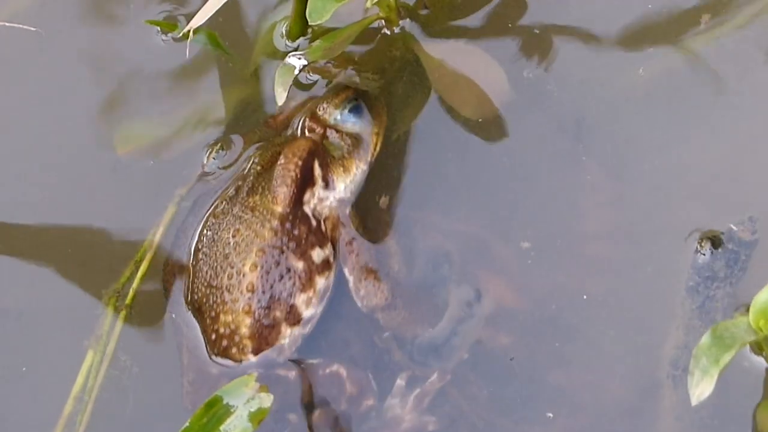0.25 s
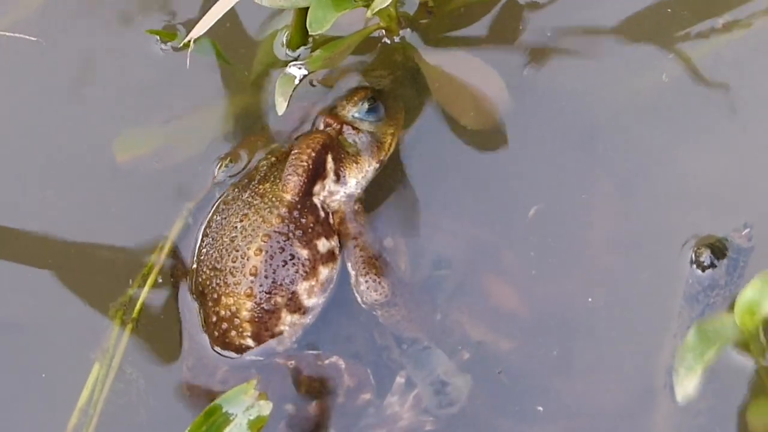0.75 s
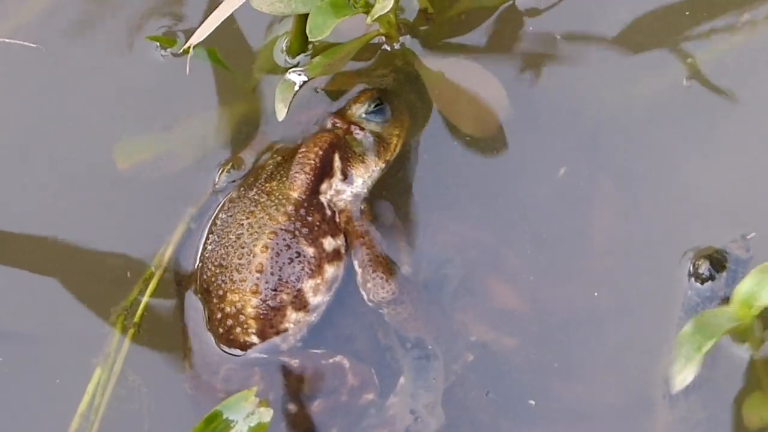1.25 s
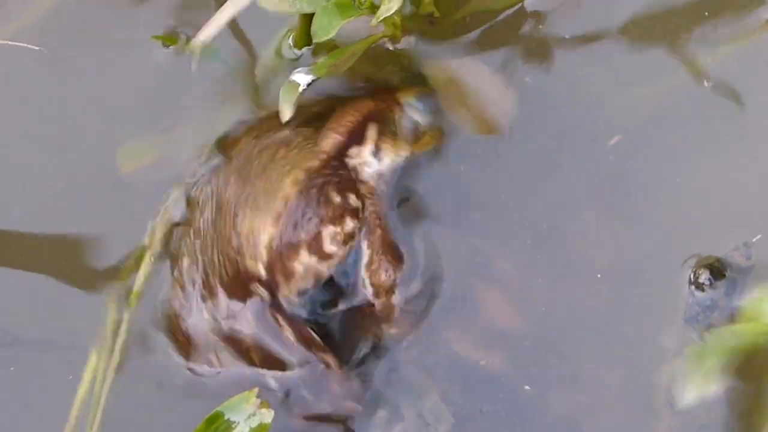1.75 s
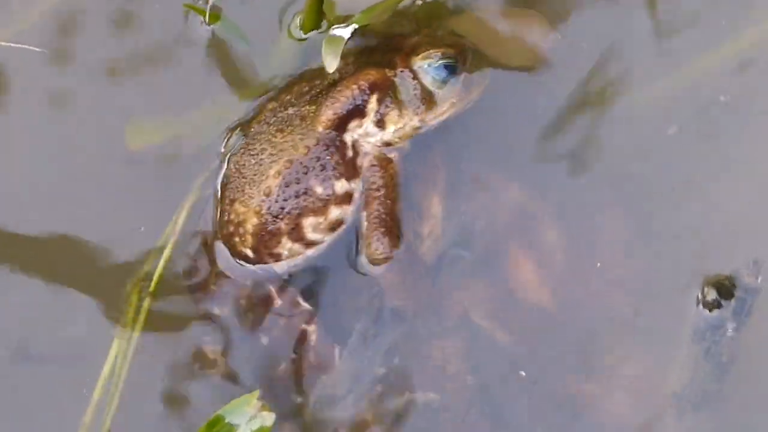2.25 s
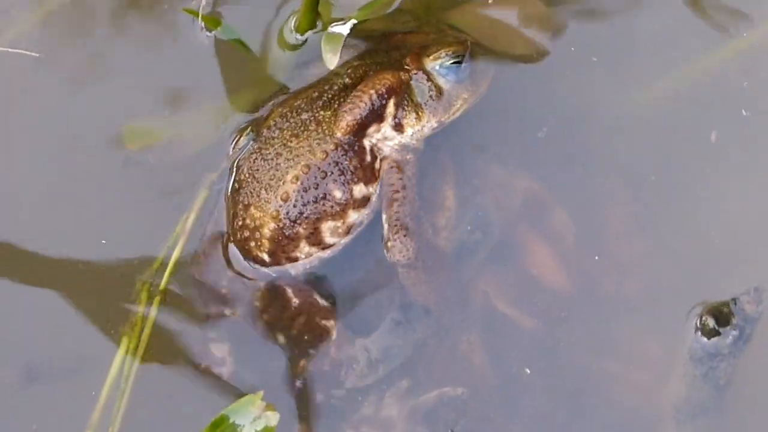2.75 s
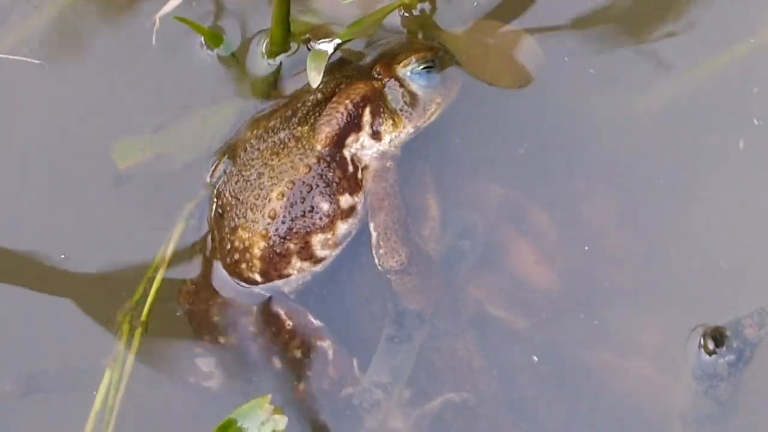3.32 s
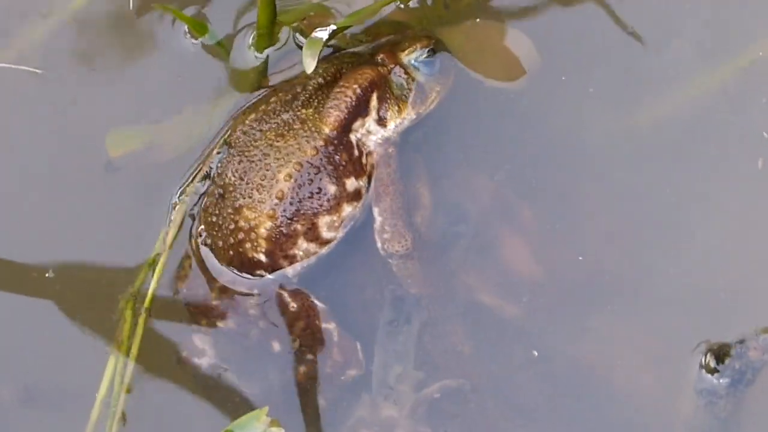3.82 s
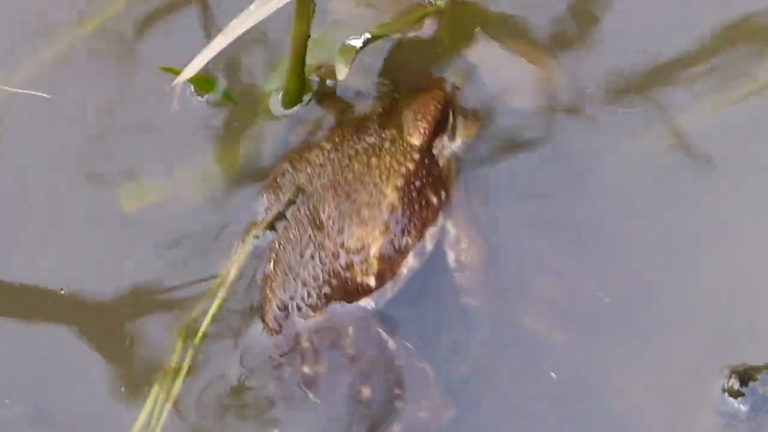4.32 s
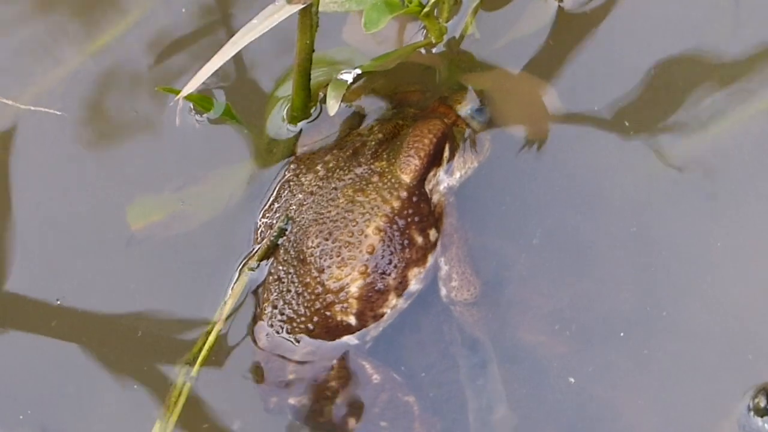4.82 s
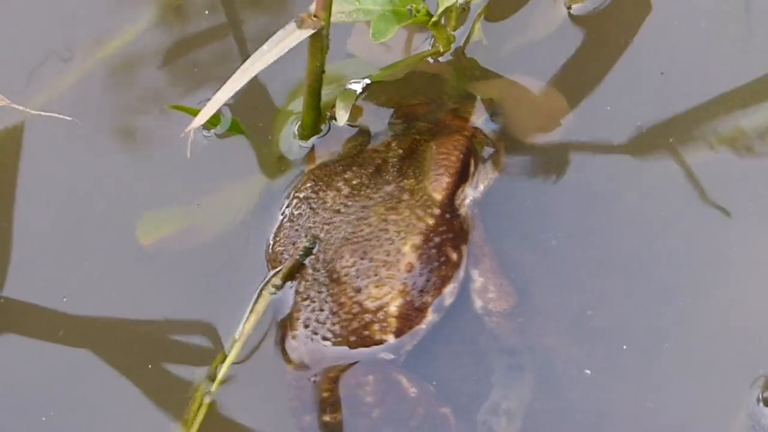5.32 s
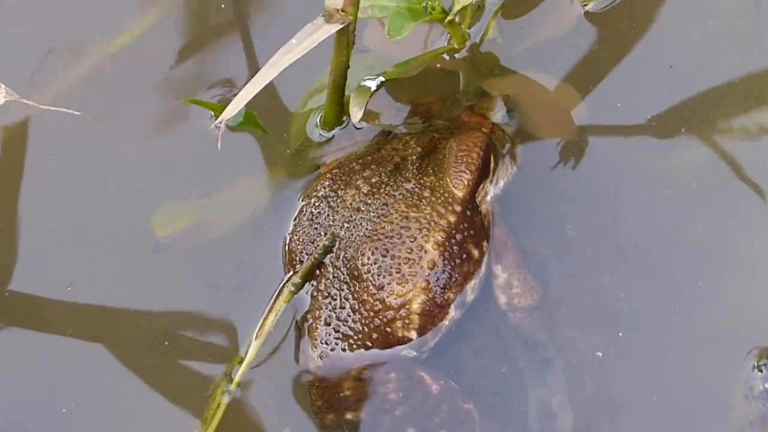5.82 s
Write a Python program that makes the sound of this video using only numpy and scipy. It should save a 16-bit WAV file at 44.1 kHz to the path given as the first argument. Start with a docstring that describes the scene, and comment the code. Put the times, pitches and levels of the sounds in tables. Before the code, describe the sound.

Rapid bubbling toad trills fill the scene, the nearest low and steady on the left, another slightly higher and softer on the right. A cricket chirps in bouts and insects pulse very high. Faint bird phrases come first, then a clear one near four seconds among short sagging frog pips. Plants tick and rustle, faint hoots glide and a soft low motor hum grows late. Open marsh air, wide close stereo pickup.

```python
"""A toad trills close by at a marsh pool, some twelve notes a second, each three puffs that ring its vocal sac.
Two more toads trill on either side and a small frog gives sagging pips; a cricket chirps sliding tones.
A katydid and a farther insect are pulsed noise bands; a bird's three-note phrase is gliding, buzzing partials.
Wet plants rustle and tick in shaped noise, air hushes, faint hoots glide; a low motor hum of a few
shaft orders sets in halfway."""
import sys
import numpy as np
from scipy import signal
from scipy.fft import rfft, irfft, next_fast_len
from scipy.io import wavfile
from scipy.ndimage import map_coordinates

SR = 44100
rng = np.random.default_rng(int(sys.argv[2]) if len(sys.argv) > 2 else 0)


def output_pcm(signal):
    """Save a mono or channel-first signal as 16-bit PCM at the path in sys.argv[1].

    Samples are clipped to [-1, 1] before scaling.
    """
    pcm = np.clip(np.atleast_2d(signal).T, -1, 1) * 32767
    wavfile.write(sys.argv[1], SR, np.round(pcm).astype(np.int16))


N = 267731
TIME = np.arange(N) / SR


def amp(db):
    """Amplitude factor of a level in dB."""
    return 10 ** (np.asarray(db) / 20)


def unit(x):
    """Scale to rms 1."""
    return x / np.sqrt(np.mean(x ** 2) + 1e-20)


def along(points, hz):
    """Interpolate (Hz, value) points on a log frequency axis."""
    point_hz, values = np.transpose(points)
    return np.interp(np.log(hz + 1), np.log(point_hz + 1), values)


def curves(rows):
    """One value per sample for each column after the time."""
    s, *columns = np.transpose(rows)
    return [np.interp(TIME, s, column) for column in columns]


def wobble(rate_hz, size=N):
    """A smooth random curve with rate_hz knots a second."""
    knots = rng.standard_normal(int(size * rate_hz / SR) + 4)
    return map_coordinates(knots, [np.arange(size) * rate_hz / SR])


def filtered(x, response):
    """Apply a complex response of frequency."""
    m = next_fast_len(N + SR // 2)
    spectrum = rfft(x, m) * response(np.fft.rfftfreq(m, 1 / SR))
    return irfft(spectrum, m)[..., :N]


def add(track, s, sound):
    """Mix a sound into a track at time s."""
    part = track[..., max(round(s * SR), 0):][..., :sound.shape[-1]]
    part += sound[..., :part.shape[-1]]


def arch(u, power):
    """A swell from 0 to 1 and back as u runs from 0 to 1."""
    return (np.abs(np.sin(np.pi * u)) ** power) * (u > 0) * (u < 1)


def phase(hz):
    """Running phase in radians of a pitch curve."""
    return 2 * np.pi * np.cumsum(hz) / SR


def rush(spectrum, alike):
    """Stereo noise of rms 1; the mid-side balance sets the left-right correlation."""
    def angle(hz):
        return np.arccos(np.clip(along(alike, hz), -1, 1)) / 2

    def mid_side(hz):
        return amp(along(spectrum, hz)) * [np.cos(angle(hz)), np.sin(angle(hz))]

    mid, side = filtered(rng.standard_normal((2, N)), mid_side)
    return unit(np.array([mid + side, mid - side]))


# Decay of the scatter. Each row: frequency in Hz, t60 in s.
BANKS_T60 = [(200, 0.8), (800, 0.62), (3500, 0.48), (12000, 0.017)]


def place(x, left_db, lead_ms, wet_db):
    """Offset a source in level and arrival, and add decaying scatter from the banks and plants."""
    sides = np.array([[.5], [-.5]])
    gains = amp(sides * left_db)
    direct = filtered(x, lambda hz: gains / gains.mean() * np.exp(2j * np.pi * hz * sides * lead_ms / 1000))
    hz, t, grains = signal.stft(rng.standard_normal((2, SR // 2)), SR, nperseg=256)
    decay = amp(-60 * t / along(BANKS_T60, hz)[:, None])
    tail = signal.istft(grains * decay, SR, nperseg=256)[1]
    tail = tail / np.linalg.norm(tail[0])
    return direct + amp(wet_db) * signal.fftconvolve(x[None], tail, axes=1)[:, :N]


def beats(tempo, first_s):
    """Beats passed since the first, at each sample."""
    rate, = curves(tempo)
    passed = np.cumsum(rate) / SR
    return passed - np.interp(first_s, TIME, passed)


def steady_notes(tempo, first_s, effort):
    """(s, dB) of each note of an unbroken trill: one a beat, driven by the effort."""
    passed = beats(tempo, first_s)
    times = np.interp(np.arange(np.ceil(passed[-1])), passed, TIME)
    return zip(times, np.interp(times, *np.transpose(effort)))


def bouts(rows):
    """(s, dB) of each note in bouts that move to full level at the start and may slow as they go."""
    for first, last, rate, slowing, start_db, full_db, swell_s in rows:
        u = np.linspace(0, 1, round((last - first) * rate) + 1)
        for s in first + (last - first) * (u + slowing * u * (u - 1)):
            yield s, np.interp(s - first, [0, swell_s], [start_db, full_db])


# Hush over time. Each row: time in s, level in dB.
HUSH_LEVEL = [(0, -42.5), (1.5, -39.5), (3.5, -41), (4.4, -37.5), (5.5, -36), (6.07, -37)]
# Hush spectrum. Each row: frequency in Hz, relative density in dB per Hz.
AIR_SPECTRUM = [(20, 14), (55, -7), (110, 2.5), (180, 8.5), (225, 3.5), (400, 5.5), (1200, 5), (2000, -6),
                (3500, -6), (5500, -6.5), (8000, -10.5), (12000, -3.5), (16000, -9)]
# Stereo width of hush, bump and rustles. Each row: frequency in Hz, left-right correlation.
LIKENESS = [(60, 1), (250, 0.71), (1000, 0.21), (3000, 0.58), (8000, 0.38), (14000, 0.093)]


def air():
    """Soft outdoor hush as wavering broadband noise, and one dull bump of low noise."""
    level_db, = curves(HUSH_LEVEL)
    hush = amp(level_db + 1.08 * wobble(7.6)) * rush(AIR_SPECTRUM, LIKENESS)
    bump_spectrum = [(30, -22), (75, 2), (140, -4), (230, -6), (400, -26), (1500, -75)]
    bump = amp(-33) * arch((TIME - 5.98) / 0.12, 1.3) * rush(bump_spectrum, LIKENESS)
    return hush + bump


# Katydid loudness. Each row: time in s, level in dB.
KATYDID_LEVEL = [(0, -73), (1.1, -68), (1.3, -48), (1.42, -47), (1.52, -42), (3, -41.5), (6.07, -41)]
# Katydid tempo. Each row: time in s, wing strokes per s.
STROKE_RATE = [(0, 23.05), (1.8, 23.05), (3.7, 22.65), (6.07, 22.8)]
KATYDID_FIRST_S = .042
# Wing noise of the katydid, then of the far insect. Each row: frequency in Hz, relative density in dB.
KATYDID_SPECTRUM = [(9000, -17), (10500, -5.5), (12000, -4.5), (13800, 0), (15000, -5.5), (16000, -11.5)]
FAR_INSECT_SPECTRUM = [(8500, -39), (10000, -4), (10900, 4.5), (11700, -10), (13000, -14), (16000, -39)]


def katydids():
    """Wings rasp to and fro, one way harder than the other; a farther insect pulses lower down."""
    level_db, = curves(KATYDID_LEVEL)
    count, u = np.divmod(beats(STROKE_RATE, KATYDID_FIRST_S), 1)
    stroke = .14 + arch(u ** 1.7, .65) * amp(1.6 * np.cos(np.pi * count))  # alternate strokes +-1.6 dB
    teeth = amp(2.3 * wobble(900))
    near = amp(level_db) * unit(stroke * teeth) * rush(KATYDID_SPECTRUM, [(12000, 0.3)])
    near = near * amp([[-2.9], [2.9]])
    pulses = .25 + arch((23.1 * TIME + .05 * wobble(3)) % 1, 1.3)
    grain = amp(2.4 * wobble(600))
    far = amp(-49) * unit(pulses * grain) * rush(FAR_INSECT_SPECTRUM, [(11000, -0.42)])
    far = far * amp([[-1.5], [1.5]])
    return near + far


# Cricket bouts. Each row: first chirp in s, last chirp in s, chirps per s, slowing as a fraction,
# starting level in dB, full level in dB, time to full level in s.
CRICKET_BOUTS = [(.009, .762, 18.6, .02, -39, -38, .3), (1.753, 2.962, 19, .012, -49, -38, .8),
                 (3.018, 3.266, 16.1, .12, -37, -39, .3), (4.675, 5.684, 18.8, .008, -45, -40, .6),
                 (5.745, 6.05, 16.4, 0, -40, -40, .3)]


def cricket():
    """Each wing stroke is a grainy tone that slides down as the wing slows."""
    out, u = np.zeros(N), np.linspace(0, 1, round(0.03 * SR))
    for s, db in bouts(CRICKET_BOUTS):
        hz = 3230 * (1 + 0.069 * (.5 - u) + 0.023 * wobble(710, size=len(u)))
        grain = 1 + 0.36 * wobble(512, size=len(u))
        add(out, s, amp(db) * arch(u, 1.34) * grain * np.sin(phase(hz)))
    return place(out, left_db=-2.4, lead_ms=-.03, wet_db=-15)


NOTE_SCATTER_DB, PUFF_SCATTER_DB = 0.34, 0.75  # standard deviations


def trill(notes, puffs, sac_hz, sac_width_hz, flatness, jitter, overtone_db):
    """Each puff of air sets the vocal cords going; the inflated sac, a resonance, rings with them."""
    cords, t = np.zeros(N), np.arange(SR // 40) / SR
    for s, db in notes:
        note_db = db + NOTE_SCATTER_DB * rng.standard_normal()
        for delay_s, length_s, hz, push_db in puffs:
            turn = 2 * np.pi * hz * (1 + jitter * rng.standard_normal()) * t
            level_db = note_db + push_db + PUFF_SCATTER_DB * rng.standard_normal()
            tone = np.sin(turn) + amp(overtone_db) * np.sin(2 * turn)
            add(cords, s + delay_s, amp(level_db) * arch(t / length_s, flatness) * tone)

    def sac(hz):
        damping = 1j * hz * sac_width_hz
        return damping / (sac_hz ** 2 - hz * hz + damping)

    return filtered(cords, sac)


# Near toad's tempo, sagging as it tires. Each row: time in s, notes per s.
NEAR_TEMPO = [(0, 12.927), (.7, 13.05), (1.6, 12.813), (1.85, 12.526), (2.85, 12.695), (3.5, 12.425),
              (3.85, 12.197), (4.15, 12.247), (5.5, 12.087), (6.07, 12.328)]
NEAR_FIRST_S = .0218
# Its effort. Each row: time in s, drive into the sac in dB.
NEAR_EFFORT = [(0, -13), (.5, -10.5), (1.1, -10.5), (1.45, -9), (2.3, -10), (3.301, -9), (4.7, -8.5),
               (5.42, -10), (5.7, -7.5), (6.07, -10.3)]
# Puffs of its note. Each row: delay in s, length in s, mean pitch in Hz, push in dB.
NEAR_PUFFS = [(0, .0059, 632, 0), (.0084, .0062, 620, .4), (.0172, .0128, 598, -2.3)]
# Radiation by its body and the water. Each row: frequency in Hz, gain in dB.
NEAR_RADIATION = [(150, -18), (350, -10), (450, 7), (550, -1.5), (800, 5.5), (1000, -11), (1500, -15)]


def near_toad():
    """Three puffs a note, the last longer and lower; body and water radiate mainly around the sac's pitch."""
    notes = steady_notes(NEAR_TEMPO, NEAR_FIRST_S, NEAR_EFFORT)
    voice = trill(notes, NEAR_PUFFS, sac_hz=664, sac_width_hz=127, flatness=.41, jitter=.008, overtone_db=-34)
    voice = filtered(voice, lambda hz: amp(along(NEAR_RADIATION, hz)))
    return place(voice, left_db=8.3, lead_ms=.02, wet_db=-19)


# Neighbour's tempo: faster at first, then close to the near toad's. Each row: time in s, notes per s.
RIGHT_TEMPO = [(0, 14.594), (.6, 13.61), (2.15, 14.183), (2.6, 12.986), (4, 12.251), (4.9, 11.65),
               (5.3, 11.895), (6.07, 12.34)]
RIGHT_FIRST_S = .037
# Its effort. Each row: time in s, drive into the sac in dB.
RIGHT_EFFORT = [(0, -21), (1, -20), (1.35, -26.5), (1.55, -20.5), (2.2, -19), (2.65, -16.5), (3.301, -19.5),
                (3.7, -15.5), (4.1, -17), (4.65, -14.5), (5.3, -19), (6.07, -21.5)]
# Puffs of its note. Each row: delay in s, length in s, mean pitch in Hz, push in dB.
RIGHT_PUFFS = [(0, .008, 745, -2), (.009, .012, 722, 0), (.023, .012, 715, -3.5)]


def neighbour_toad():
    """A higher voice on the right in three puffs, drifting in and out of step with the near one."""
    notes = steady_notes(RIGHT_TEMPO, RIGHT_FIRST_S, RIGHT_EFFORT)
    voice = trill(notes, RIGHT_PUFFS, sac_hz=722, sac_width_hz=175, flatness=0.3, jitter=0.028, overtone_db=-42)
    return place(voice, left_db=-6.5, lead_ms=.11, wet_db=-14)


# Small toad's bouts. Each row: first note in s, last note in s, notes per s, slowing as a fraction,
# starting drive in dB, full drive in dB, time to full drive in s.
SMALL_TOAD_BOUTS = [(.044, 1.229, 11, 0.01195, -21.5, -23.5, 1), (3.256, 6.043, 11.85, .028, -32.5, -22, 1)]


def small_toad():
    """A thin, husky trill on the left, four puffs a note, that stops for two seconds and starts again."""
    # each row: delay in s, length in s, mean pitch in Hz, push in dB
    puffs = [(0, .006, 950, 0), (.0084, .006, 950, 0), (.017, .008, 850, -3), (.027, .007, 810, -7)]
    notes = bouts(SMALL_TOAD_BOUTS)
    voice = trill(notes, puffs, sac_hz=871, sac_width_hz=244, flatness=0.34, jitter=0.026, overtone_db=-12)
    husk = 1 + .3 * wobble(900)  # uneven air flow roughens each puff
    return place(voice * husk, left_db=12, lead_ms=-.1, wet_db=-10)


# Rustles in the wet plants. Each row: start in s, length in s, level in dB.
PLANT_RUSTLES = [(0.57, 0.22, -47), (2.467, 0.037, -41.5), (2.8, 0.13, -37.5), (3.872, 0.099, -37.5),
                 (4.521, 0.11, -34), (4.619, 0.197, -34.5), (4.839, 0.18, -36), (5.005, 0.62, -62)]
# Ticks of stems and drops. Each row: time in s, peak in dB before panning, pitch in Hz, t60 in s,
# left over right in dB.
PLANT_TICKS = [(1.927, -21.5, 7400, 0.012, 17), (2.123, -29, 3500, 0.022, 8),
               (2.838, -26.5, 2220, 0.039, 13.5), (4.71, -19, 3000, 0.0033, -15),
               (4.712, -26, 2980, 0.0024, -17)]


def plants():
    """Rustles are swells of grainy noise; ticks are short decaying bursts of band-passed noise."""
    swell = sum(amp(db) * arch((TIME - s) / length_s, 0.56) for s, length_s, db in PLANT_RUSTLES)
    colour = [(150, -37), (350, 5), (1500, 2), (4000, 2.0), (9000, 0), (12000, -10), (16000, -45)]
    grain = unit(amp(0.98 * wobble(700) + 1.9 * wobble(60)))
    out = swell * grain * rush(colour, LIKENESS)
    t = np.arange(SR // 20) / SR
    for s, db, hz, t60_s, left_db in PLANT_TICKS:
        band = signal.butter(1, [hz / 1.7, min(hz * 1.54, SR / 2 - 1)], "band", fs=SR)
        tick = signal.lfilter(*band, rng.standard_normal(len(t)) * amp(-60 * t / t60_s))
        gains = amp(db + left_db * np.array([[.5], [-.5]]))
        add(out, s, gains * tick / np.abs(tick).max())
    return out


SOFT_NOTE_DULLING = 0.64  # dB the partials above the second lose per dB below full voice
FULL_VOICE_DB = -29


def bird_notes(notes, shape, partials, rasp, buzz_hz):
    """Gliding partials; a fast buzz in pitch and level makes them raspy, and soft notes are purer."""
    out = np.zeros(N)
    when, share, shape_db = np.transpose(shape)
    t = np.arange(0, when[-1], 1 / SR)
    for s, top_hz, db in notes:
        buzz = np.sin(phase(buzz_hz * (1 + 0.16 * wobble(61.3, size=len(t)))))
        buzz = buzz + 0.46 * wobble(704, size=len(t))
        drift = 1 + 0.036 * rasp * buzz + .0028 * wobble(60.0, size=len(t))
        turn = phase(top_hz * np.interp(t, when, share) * drift)
        level_db = db + np.interp(t, when, shape_db)
        swell = amp(level_db + 3 * rasp * buzz + 1.5 * wobble(60, size=len(t)))
        dull_db = SOFT_NOTE_DULLING * min(db - FULL_VOICE_DB, 0)
        voice = sum(amp(partial_db + dull_db * (k > 2)) * np.sin(k * turn) for k, partial_db in partials)
        add(out, s, swell * voice)
    return out


REEDS_S, REEDS_DB = .05, -5.5  # latest echo; level of all echoes together


def through_reeds(x, count):
    """Add a few weak, quick echoes off nearby plants."""
    out = x.copy()
    for delay_s, sign in zip(rng.uniform(.003, REEDS_S, count), rng.choice([-1, 1], count)):
        add(out, delay_s, sign * amp(REEDS_DB) / np.sqrt(count) * x)
    return out


# Bird's rising notes, falling notes and whistles. Each row: start in s, reference pitch in Hz, base level in dB.
RISING_NOTES = [(.985, 1960, -36.5), (1.96, 2012, -37.5), (3.791, 1988, -21), (5.17, 1950, -33.5)]
FALLING_NOTES = [(1.325, 1846, -32.5), (4.081, 1770, -23.5), (5.513, 1900, -33.5)]
WHISTLED_NOTES = [(1.52, 1556, -42.5), (4.262, 1589, -29.5), (5.715, 1636, -38.5)]
# Their contours. Each row: time into the note in s, share of the reference pitch, level in dB.
RISE_CONTOUR = [(0, .77, -20), (.028, .87, -13.5), (.05, .97, -7), (0.097, 0.97, -1), (.125, .99, -12),
                (.155, 0.91, -26)]
FALL_CONTOUR = [(0, .68, -24), (.018, .8, -12), (0.025, 0.99, -1.5), (0.046, 0.95, -1), (0.074, .83, -6.5),
                (.1, .73, -13), (0.124, .6, -24)]
WHISTLE_CONTOUR = [(0, .76, -13), (.04, .92, -4.5), (0.089, .984, -2.5), (.15, 1, 3), (.22, 0.98, -4.5),
                   (.28, .95, -9), (0.311, .8, -24)]
# Partials of rising and falling notes, then of whistles. Each row: multiple of the pitch, level in dB.
CHIRP_TIMBRE = [(1, -17), (2, 0), (3, -19), (4, -29)]
WHISTLE_TIMBRE = [(1, -7), (2, 0), (3, -8), (4, -20), (5, -15)]


def bird():
    """A raspy rising note, a falling one and a long nasal whistle, all strongest on the second partial."""
    rises = bird_notes(RISING_NOTES, RISE_CONTOUR, CHIRP_TIMBRE, rasp=.8, buzz_hz=175)
    falls = bird_notes(FALLING_NOTES, FALL_CONTOUR, CHIRP_TIMBRE, rasp=.5, buzz_hz=175)
    whistles = bird_notes(WHISTLED_NOTES, WHISTLE_CONTOUR, WHISTLE_TIMBRE, rasp=.03, buzz_hz=175)
    song = rises + falls + whistles
    return place(through_reeds(song, count=8), left_db=-2.5, lead_ms=0, wet_db=-9)


# Frog's pips. Each row: start in s, mid pitch in Hz, peak level in dB.
FROG_PIPS = [(2.609, 1165, -39), (2.831, 1164, -37.5), (2.955, 1210, -40), (3.418, 1202, -28),
             (3.647, 1190, -27), (3.877, 1169, -25.5), (4.115, 1172, -24), (4.351, 1180, -27),
             (4.612, 1170, -24.5), (4.754, 1232, -27.5), (4.86, 1230, -35.5), (5.003, 1293, -31.5),
             (5.316, 1184, -35.5), (5.485, 1280, -32.5), (5.559, 1265, -30.5), (5.979, 1230, -34)]


def frog():
    """Short pure pips that sag in pitch."""
    out, u = np.zeros(N), np.linspace(0, 1, round(.065 * SR))
    for s, hz, db in FROG_PIPS:
        sagging_hz = hz * (1 + 0.076 * (.5 - u))
        add(out, s, amp(db) * arch(u, 1.37) * np.sin(phase(sagging_hz)))
    return place(out, left_db=-2.0, lead_ms=-0.024, wet_db=-23)


SHAFT_HZ, MOTOR_RISE_S, MOTOR_FALL_S = 41.6, 0.054, 0.085
# Upper shaft orders. Each row: multiple of the shaft rate, mean dB added to the spell's upper-order level.
UPPER_ORDERS = [(3, -4.5), (4, -13.5), (6, -14), (7, -23.5)]
# Motor spells. Each row: start in s, end in s, second-order level in dB, upper-order level in dB.
MOTOR_SPELLS = [(2.985, 3.354, -49, -48), (3.392, 5.19, -43, -45.5), (5.144, 5.48, -38, -36.5),
                (5.588, 6.15, -36.5, -37)]


def motor():
    """A low hum of a few shaft orders that starts, pauses and grows."""
    turn = phase(SHAFT_HZ * (1 + 0.0025 * wobble(8)))
    upper = sum(amp(db + 1.5 * wobble(8.3)) * np.sin(round(k) * turn) for k, db in UPPER_ORDERS)
    second, out = np.sin(2 * turn), np.zeros(N)
    for start, end, second_db, upper_db in MOTOR_SPELLS:
        running = np.clip(np.minimum((TIME - start) / MOTOR_RISE_S, (end - TIME) / MOTOR_FALL_S), 0, 1)
        out += running * (amp(second_db) * second + amp(upper_db) * upper)
    return np.sqrt(2) * out  # makes the levels rms


# Faint hoots. Each row: start in s, length in s, starting pitch in Hz, ending pitch in Hz, level in dB.
FAR_HOOTS = [(4.104, 0.22, 274, 336, -45.5), (4.672, 0.2, 253, 284, -47), (4.802, 0.14, 343, 350, -44)]


def hoots():
    """Soft low sine glides from far off."""
    out = np.zeros(N)
    for s, length_s, start_hz, end_hz, db in FAR_HOOTS:
        u = np.linspace(0, 1, round(length_s * SR))
        glide_hz = start_hz + (end_hz - start_hz) * u
        add(out, s, amp(db) * arch(u, 0.84) * np.sin(phase(glide_hz)))
    return place(out, left_db=5, lead_ms=0, wet_db=-13)


def scene():
    """Sum of all sources."""
    insects = katydids() + cricket()
    toads = near_toad() + neighbour_toad() + small_toad()
    return air() + insects + toads + plants() + bird() + frog() + motor() + hoots()


LOW_CUT_HZ, TOP_HZ = 40, 15850


def record(dry):
    """Thin the deepest bass with a second-order slope and remove everything above the band limit."""
    def response(hz):
        low_cut = hz ** 2 / np.hypot(hz ** 2, LOW_CUT_HZ ** 2)
        return low_cut * (hz < TOP_HZ)

    return filtered(dry, response)


dry = scene()
out = record(dry)
output_pcm(out)
```